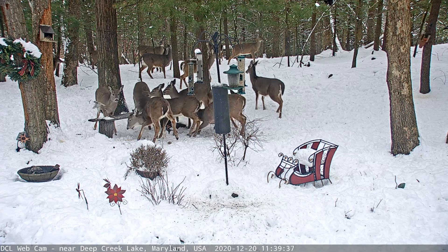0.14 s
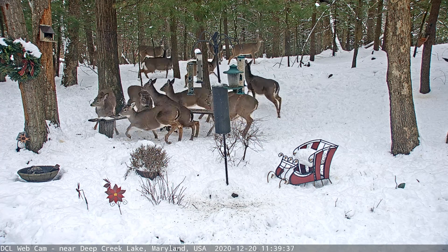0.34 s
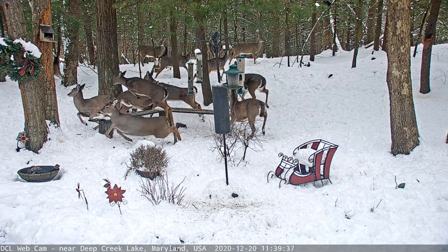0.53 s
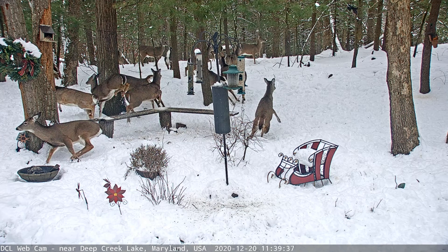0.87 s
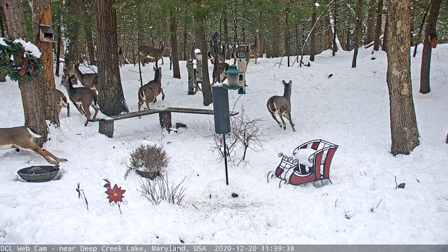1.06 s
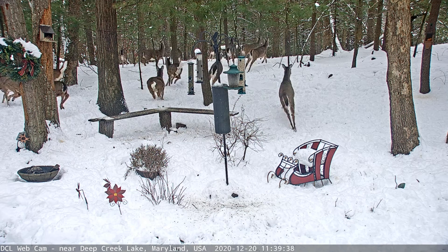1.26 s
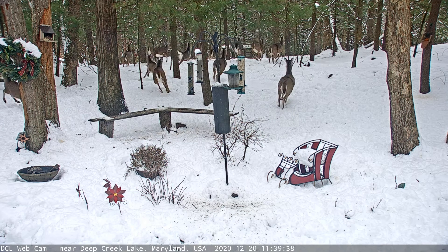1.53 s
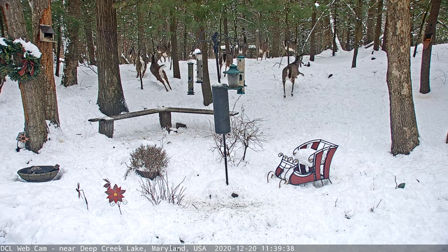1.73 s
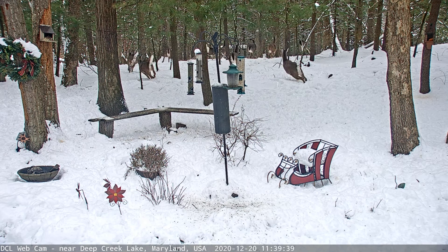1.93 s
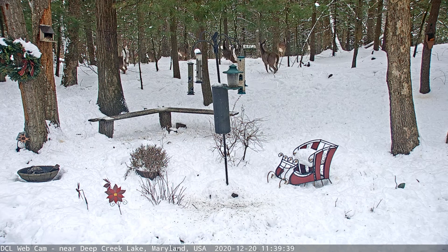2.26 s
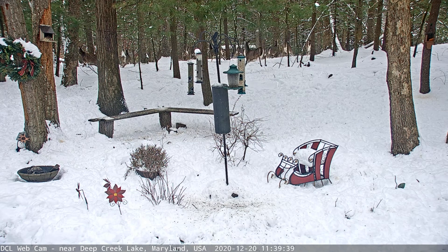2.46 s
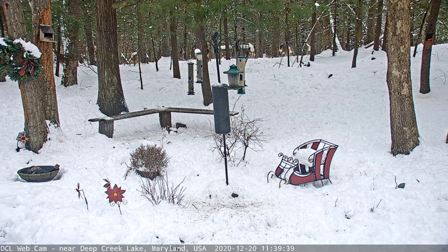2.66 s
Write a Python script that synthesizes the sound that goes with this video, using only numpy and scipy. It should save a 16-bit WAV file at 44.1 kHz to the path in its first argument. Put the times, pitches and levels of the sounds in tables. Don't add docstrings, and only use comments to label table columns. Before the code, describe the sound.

A roof avalanche: crusted snow cracks, tears loose, rumbles and scrapes down, then settles with crunches

```python
import sys
import numpy as np
from scipy import signal
from scipy.fft import rfft, irfft, next_fast_len
from scipy.io import wavfile
from scipy.ndimage import uniform_filter1d, map_coordinates

SR = 44100
rng = np.random.default_rng(int(sys.argv[2]) if len(sys.argv) > 2 else 0)


def invert_db(x):
    u = np.asarray(x, float) / 20
    return 10 ** u


def put_to_file(sound):
    columns = np.atleast_2d(sound).T
    safe = np.clip(columns, -1, 1)
    whole_steps = np.round(safe * 32767)
    wavfile.write(sys.argv[1], SR, whole_steps.astype(np.int16))


N = 125685


def unit(x):
    return x / np.sqrt(np.mean(x ** 2) + 1e-20)


def curve(rows):
    start_s, value = np.transpose(rows)
    return np.interp(np.arange(N) / SR, start_s, value)


def wobble(knots_per_s):
    return map_coordinates(rng.standard_normal(400), [np.arange(N) * knots_per_s / SR])


def filtered(x, response):
    m = next_fast_len(N + SR // 2)
    return irfft(rfft(x, m) * response(np.fft.rfftfreq(m, 1 / SR)), m)[..., :N]


def coloured(x, points):
    pitch_hz, level_db = np.transpose(points)

    def response(f):
        return invert_db(np.interp(np.log(f + 1), np.log(pitch_hz + 1), level_db))

    return unit(filtered(x, response))


def resonance(f, pitch_hz, width_hz):
    damping = 1j * f * width_hz
    return damping / (pitch_hz * pitch_hz - f * f + damping)


def grains(per_s, scatter_db):
    chance, size = rng.random(N), rng.exponential(size=N)
    sign = np.sign(rng.standard_normal(N))
    return unit((chance < per_s / SR) * invert_db(scatter_db * np.minimum(size, 4)) * sign)


# start_s, level_db
AIR_LEVEL = [(0, -20.5), (.05, -27), (.2, -32), (.36, -23.5), (.5, -28.5), (.58, -21), (.9, -16),
             (1.55, -11.5), (1.66, -13), (1.9, -8), (2.0, -16), (2.16, -12), (2.33, -14.5), (2.4, -26.5),
             (2.5, -16), (2.64, -26), (2.85, -27.5)]
# pitch_hz, level_db (per Hz)
AIR_COLOUR = [(12, -37), (28, 3), (45, -5), (90, -19.5), (250, -34), (600, -74)]


def air():
    return invert_db(curve(AIR_LEVEL)) * coloured(rng.standard_normal(N), AIR_COLOUR)


def yard(x):
    t60_s, gap_s = .2, .004
    t = np.arange(SR // 3) / SR
    tail = rng.standard_normal(len(t)) * invert_db(-60 * t / t60_s) * (t > gap_s)
    return signal.fftconvolve(x, tail / np.linalg.norm(tail))[:N]


def drum(pitch_hz, width_hz):
    return unit(filtered(grains(300, 4.4), lambda f: resonance(f, pitch_hz, width_hz) ** 2))


def hoof_thuds():
    t = np.arange(N) / SR
    centre_s, lasts_s, level_db = 2.36, 0.18, -30.5
    return drum(171, 117) * invert_db(level_db) * np.exp(-.5 * ((t - centre_s) / lasts_s) ** 2)


# start_s, level_db
SLIDE_LEVEL = [(0, -53), (.2, -52), (.23, -37.5), (.43, -31), (.46, -46), (.56, -26.5), (.573, -21),
               (.655, -15.5), (.67, -10.5), (.87, -5), (1.2, 0.5), (1.78, -5), (1.89, -13), (1.98, -7),
               (2.17, -12.5), (2.21, -30.5), (2.55, -42), (2.85, -44)]


def ridge():
    t = np.arange(N) / SR
    level_db, tear_s, falls_db_per_s = -2, .7, 10.5
    level = curve(SLIDE_LEVEL) + level_db - falls_db_per_s * np.maximum(t - tear_s, 0)
    return drum(191.3, 122) * invert_db(level)


# start_s, level_db, pitch_hz
CHIP_TICKS = [(.168, -8, 4840), (0.235, -21, 6670), (.386, -33, 6230), (0.407, -3, 6870), (0.506, -9, 7220),
              (.510, -7, 6660), (2.289, -5.5, 6100), (2.2925, -4.5, 5500), (2.336, -10, 5100),
              (2.529, -5.5, 5500), (2.534, -7.5, 5000), (2.673, -14, 4950), (2.827, -18, 4670)]


def chips():
    t60_s = 0.016
    t = np.arange(N) / SR
    out = np.zeros(N)
    for start_s, level_db, pitch_hz in CHIP_TICKS:
        age = t - start_s
        fade = invert_db(level_db - 60 * np.clip(age, 0, .1) / t60_s)
        out += (age > 0) * fade * np.sin(2 * np.pi * pitch_hz * age)
    return out


# start_s, level_db, rise_s, t60_s
CRUST_BREAKS = [(.070, -18.5, 0.0025, 0.027), (0.096, -24, 0.0013, 0.032), (.114, -29, 0.01, .08),
                (.168, -13.5, 0.0017, 0.074), (0.22, -12.5, 0.0073, 0.23), (.260, -10.5, 0.013, 0.039),
                (0.309, -12, 0.007, 0.075), (0.342, -23, 0.0017, 0.018), (0.356, -11.5, 0.0079, 0.067),
                (.374, -6.5, 0.014, 0.04), (.405, -13, .001, 0.053), (0.413, -6.5, .002, 0.01),
                (0.424, -12, 0.0048, .045), (0.504, -16, 0.0017, 0.068), (0.519, -14, .006, 0.032),
                (0.59, -21, 0.0012, 0.15), (2.035, -2.5, .005, 0.064), (2.289, -16, 0.00094, 0.063),
                (2.334, -20, .002, 0.039), (2.445, -27, .003, 0.067), (2.529, -10, 0.00091, 0.027),
                (2.561, -32, .002, 0.032), (2.645, -25, 0.0033, 0.064), (2.702, -42, 0.012, 0.066),
                (2.758, -21.5, 0.0075, 0.087), (2.824, -16, 0.00074, 0.017)]
# pitch_hz, level_db (per Hz)
SNAP_COLOUR = [(200, -55), (700, -3.5), (1500, 0.5), (3000, -0.5), (5000, 5.5), (6800, 10), (9000, -2)]


def crunches():
    t = np.arange(N) / SR
    shape = np.zeros(N)
    for start_s, level_db, rise_s, t60_s in CRUST_BREAKS:
        age = t - start_s
        crumble = invert_db(level_db - 60 * np.clip(age - rise_s, 0, 1) / t60_s)
        shape += crumble * np.clip(age / rise_s, 0, 1)
    crust = grains(4600, 4.3) + 0.38 * rng.standard_normal(N)
    return shape * coloured(crust, SNAP_COLOUR) * invert_db(0.84 * wobble(120))


def crystals(count, scatter_db):
    centre_hz, spread, cycles = 5500, 0.27, 2.12
    draw, t = rng.random((count, 4)), np.arange(96) / SR
    pitch_hz = centre_hz * np.exp(spread * 3 * (draw[:, 1:2] - .5))
    size = invert_db(-scatter_db * np.log(draw[:, 2:3] + .02))
    rings = size * np.sin(2 * np.pi * pitch_hz * t) * np.exp(-t * pitch_hz / cycles)
    at = (draw[:, :1] * N).astype(int) + np.arange(len(t))
    return unit(np.bincount(at.ravel(), rings.ravel(), minlength=N)[:N])


def patchy(x, depth_db):
    z = signal.stft(x, nperseg=512)[2]
    field = uniform_filter1d(rng.standard_normal(z.shape), size=7, axis=0)
    field = uniform_filter1d(field, size=4, axis=1)
    return signal.istft(z * invert_db(depth_db * unit(field)), nperseg=512)[1][:N]


# start_s, level_db
POUR_LEVEL = [(0, -29), (.1, -25), (.2, -27.5), (.35, -20.5), (.48, -24), (.58, -26), (.67, -15.5),
              (.87, -5.5), (1.3, -0.5), (1.7, -5), (2.04, -6), (2.17, -15), (2.33, -16.5), (2.41, -19.5),
              (2.5, -19.5), (2.58, -21.5), (2.7, -24.5), (2.85, -29.5)]
# pitch_hz, level_db (per Hz)
HISS_COLOUR = [(150, -37), (600, -36), (2000, -12), (3500, -8.5), (5000, -0.5), (6000, 1.5), (6800, 6),
               (9000, -5)]


def pour():
    grains_per_s, scatter_db, hiss_db = 3500, 5, 3
    hiss = grains(grains_per_s, scatter_db) + invert_db(hiss_db) * rng.standard_normal(N)
    stream = unit(coloured(hiss, HISS_COLOUR) + 0.35 * crystals(count=4000, scatter_db=2.5))
    flutter_db = 0.36 * wobble(21.68) + 1.26 * wobble(60)
    return patchy(stream, depth_db=1.5) * invert_db(curve(POUR_LEVEL) + flutter_db)


# pitch_hz, width_hz, level_db
ROOF_PANELS = [(164, 81, -10), (253, 74, -2), (287, 78, 5), (381, 155, 2.5), (758, 107, -3.5),
               (916, 144, -5), (1375, 170, -3.5), (1554, 304, -5), (2560, 1400, -14)]


def panels(f):
    return sum((-1) ** k * invert_db(level_db) * resonance(f, pitch_hz, width_hz)
               for k, (pitch_hz, width_hz, level_db) in enumerate(ROOF_PANELS))


def rafters(drive):
    t = np.arange(N) / SR
    level_db, peak_s, falls_db_per_s = -6, 1.74, 1.5
    load = drive * invert_db(level_db - falls_db_per_s * abs(t - peak_s))
    return 3 * filtered(load, lambda f: resonance(f, 97.2, 46))


# start_s, level_db, width_s
LUMP_HITS = [(0.237, -15.5, 0.0022), (.243, -13.5, 0.0029), (.540, -5.5, 0.0008), (0.545, -8, .0013),
             (.570, -10, 0.00064), (.576, -23, .0004), (.584, -21, 0.00031), (.595, -5.5, 0.00085),
             (.610, -5.5, .0009), (.618, -3, .0009), (.644, -3.5, 0.00068), (0.673, -4, .001),
             (2.17, -6, .0008), (2.177, -6.5, 0.0002)]


def lumps():
    t = np.arange(N) / SR
    out = np.zeros(N)
    for start_s, level_db, width_s in LUMP_HITS:
        u = ((t - start_s) / width_s) ** 2
        out += invert_db(level_db) * (1 - u) * np.exp(-.5 * u)
    return out


def roof():
    knocks_per_s, scatter_db, scrape_db, lump_ring_db = 700, 3, 2, -10.5
    drive = grains(knocks_per_s, scatter_db) + invert_db(scrape_db) * rng.standard_normal(N)
    drive = drive / np.std(filtered(drive, panels))
    shudder_db, rattle_db = 1.3 * wobble(14), 1.6 * wobble(45)
    drive = drive * invert_db(curve(SLIDE_LEVEL) + shudder_db + rattle_db)
    hits = lumps()
    return filtered(drive + invert_db(lump_ring_db) * hits, panels) + rafters(drive) + hits


def scene():
    snow = roof() + pour() + crunches() + chips() + ridge() + hoof_thuds()
    yard_db = -18
    return (snow + invert_db(yard_db) * yard(snow) + air())[None]


# pitch_hz, level_db
BAND_EDGE = [(7200, 0), (7600, -7), (8000, -16.5), (8600, -16), (8900, -18), (9200, -60), (9300, -120)]


def narrow_band(x):
    pitch_hz, level_db = np.transpose(BAND_EDGE)
    return filtered(x, lambda f: invert_db(np.interp(f, pitch_hz, level_db)))


def roll_off(x):
    return signal.sosfilt(signal.butter(12, 15970, fs=SR, output="sos"), x)


def record(dry):
    converter_top, output_top, hardness = .7, .718, 24
    x = narrow_band(np.clip(dry, -converter_top, converter_top))
    x = x / (1 + np.abs(x / output_top) ** hardness) ** (1 / hardness)
    return roll_off(x)


dry = scene()
out = record(dry)
put_to_file(out)
```